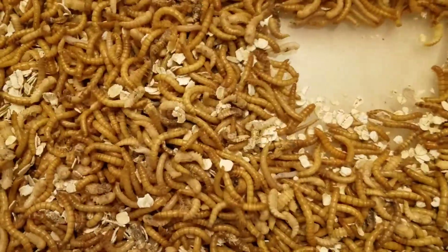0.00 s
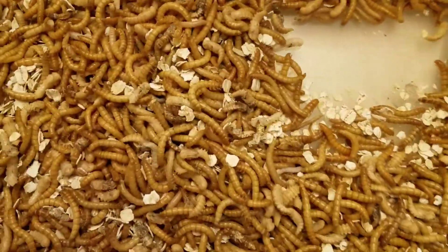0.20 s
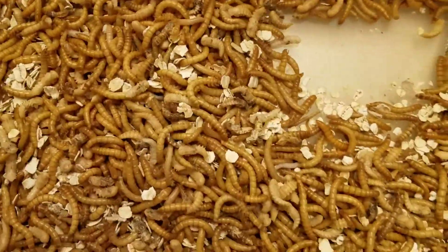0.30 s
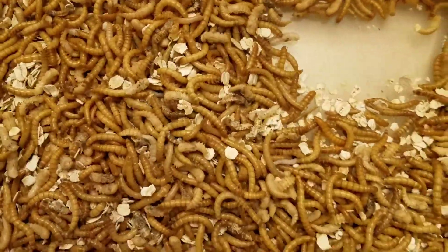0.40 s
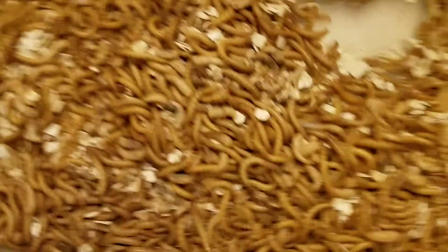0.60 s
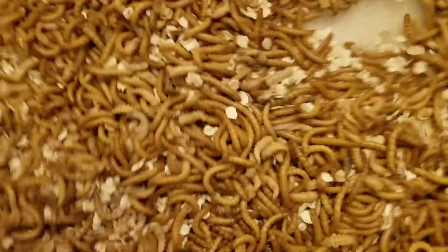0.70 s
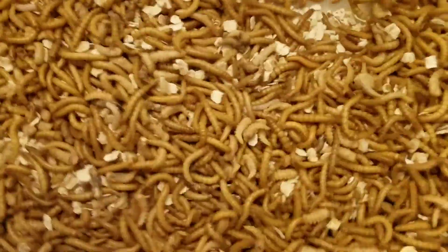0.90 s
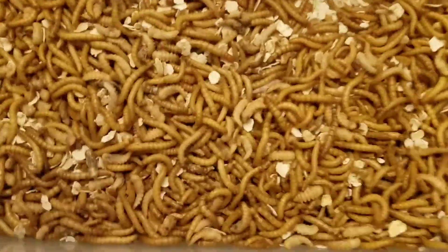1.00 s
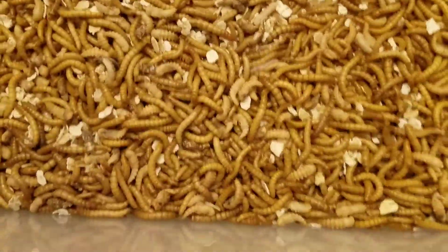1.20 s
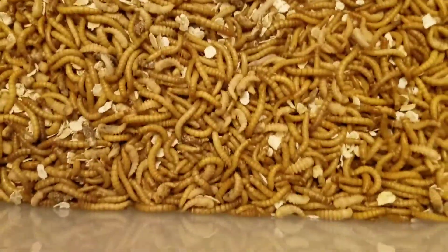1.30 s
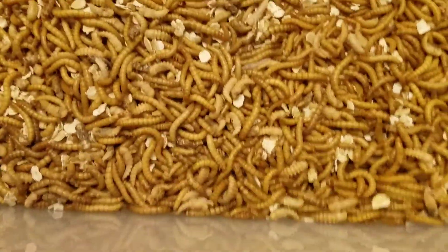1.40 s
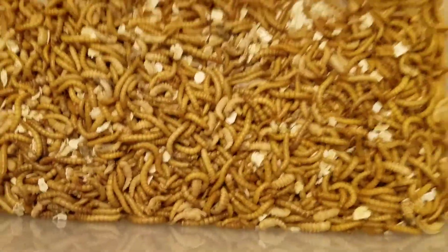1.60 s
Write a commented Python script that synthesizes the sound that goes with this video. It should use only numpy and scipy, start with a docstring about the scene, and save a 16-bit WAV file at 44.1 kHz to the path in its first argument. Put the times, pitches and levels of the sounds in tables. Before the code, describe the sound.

Close to the left microphone, a hand rustles through dry oats and mealworms, catching with snaps and soft bumps between a few dull taps. A steady motor hum and faint crackle of crawling worms fill the room.

```python
"""Dull taps and a few soft bumps sound over a room's motor hum and the faint crackle of mealworms.
A hand is moving over their tub of dry oats, right beside the left microphone. It makes one dry, grainy
brushing stroke, built from thousands of tiny slips. The skin catches with a snap and judders in quick
runs of stick and slip, knocking the hollow casing. A last double tap ends the gesture."""
import sys
import numpy as np
from scipy import signal
from scipy.fft import rfft, irfft
from scipy.io import wavfile

SR = 44100
rng = np.random.default_rng(int(sys.argv[2]) if len(sys.argv) > 2 else 0)


def transcribe(u):
    """Save the signal u as a 16-bit wav file named by the first command-line argument.

    u: samples, shape (n,) or (channels, n), limited to [-1, 1]; the rate is SR.
    q: integer samples, one column per channel.
    """
    v = np.clip(np.atleast_2d(u).T, -1, 1)
    q = np.round(v * 32767).astype(np.int16)
    wavfile.write(sys.argv[1], SR, q)


N = 74970
T = np.arange(N) / SR

# tone of dry friction, for the stroke and the worms: freq_hz, gain_db
FRICTION_EQ = [(150, -20.5), (350, 0.5), (600, -1.5), (790, 2.5), (1000, -12), (1140, 2), (1550, -3.5),
               (1950, 1.5), (2350, -0.5), (2750, 0.5), (3300, -6.5), (4400, -2.5), (6500, -7), (8100, -0.5),
               (9200, -9), (10500, -21), (13000, -26.5), (16000, -32)]
# sharp catches of the skin: start_s, snap_gain_db, knock_gain_db, crumble_s, right_db
CATCHES = [(0.442, -8, -22, 0.0037, -15), (0.4721, -4.5, -31, 0.00047, -2), (0.503, -35, -25, .003, 0),
           (0.6951, 0.5, -17, 0.0042, -28), (0.7, -12.5, -21.5, 0.0018, 5.5),
           (0.7405, -7.5, -20, 0.0013, -0.5), (0.781, -4, -43, 0.00035, -19),
           (0.8132, -1.5, -40, 0.00053, -16), (0.8375, -11, -17.5, 0.0015, -11),
           (0.8753, -2.5, -15.5, 0.0017, -16), (0.9218, -5, -18.5, 0.00028, -3),
           (0.9308, -0.5, -12, 0.0014, -22), (0.991, -21.5, -33, 0.0016, -13),
           (1.2532, -22.5, -39, .002, -1.5)]
# tone of the skin's snaps and grit: freq_hz, gain_db
SNAP_EQ = [(200, 3), (900, -14), (2000, 6), (2700, -3), (3500, -3), (5500, -1), (6800, -6.5), (8000, 5),
           (9500, -13), (11000, -18.5), (16000, -56)]
# resonances of the hollow casing: pitch_hz, gain_db, t60_s
CASING_MODES = [(334, -13.5, 0.058), (477, 0, 0.036), (573, -5, 0.059), (794, 0.5, 0.024), (1127, 0, 0.039),
                (1285, -1, 0.046), (1670, -10.5, 0.09), (2090, -1.5, 0.018), (2880, -7, 0.0077)]
# shading of the far (right) microphone: freq_hz, gain_db
FAR_SIDE_EQ = [(200, -5), (500, -2), (1000, -5.5), (2000, -11.5), (4500, -11), (8000, -10), (13000, 1)]


def from_db(db):
    """Decibels to gain."""
    return 10 ** (np.asarray(db) / 20)


def rms_one(x):
    """Scale to unit rms."""
    return x / np.sqrt(np.mean(x ** 2) + 1e-20)


def fader(points):
    """Gain along a (time_s, gain_db) curve, silent outside it."""
    time_s, gain_db = np.transpose(points)
    return from_db(np.interp(T, time_s, gain_db, left=-120, right=-120))


def colour(x, points):
    """Minimum-phase EQ through (freq_hz, gain_db) points."""
    size = 2 * N
    hz, db = np.transpose(points)
    grid = np.maximum(np.arange(N + 1) * SR / size, 1)
    cepstrum = irfft(np.log(from_db(np.interp(np.log(grid), np.log(hz), db))))
    cepstrum[1:N] *= 2
    cepstrum[N + 1:] = 0
    return irfft(rfft(x, size) * np.exp(rfft(cepstrum)))[..., :N]


def noise(eq, shape=N):
    """Coloured noise at unit rms."""
    return rms_one(colour(rng.standard_normal(shape), eq))


def drift(rate_hz):
    """Smooth random wander at unit rms."""
    pole = np.exp(-2 * np.pi * rate_hz / SR)
    return rms_one(signal.lfilter([1], [1, -2 * pole, pole * pole], rng.standard_normal(2 * N))[N:])


def grains(per_s, spread_db):
    """Random clicks of uneven size, separate for each side."""
    sizes = from_db(spread_db * np.minimum(rng.exponential(1, (2, N)), 5))
    return sizes * rng.choice([-1, 1], (2, N)) * (rng.random((2, N)) < per_s / SR)


def sides(right_db):
    """Gains of left and right."""
    return np.array([[1], [from_db(right_db)]])


def ring(x, modes):
    """Damped resonances of alternating polarity, set ringing by x."""
    out = 0
    for k, (hz, db, t60_s) in enumerate(modes):
        radius, angle = from_db(-60 / (t60_s * SR)), 2 * np.pi * hz / SR
        mode = signal.lfilter([0, np.sin(angle)], [1, -2 * radius * np.cos(angle), radius ** 2], x + 1e-18)
        out = out + (-1) ** k * from_db(db) * mode
    return out


def fall(start_s, decay_s):
    """Sudden start, exponential decay."""
    return (T >= start_s) * np.exp(-np.maximum(T - start_s, 0) / decay_s)


def swell(centre_s, half_s):
    """A bell-shaped rise and fade."""
    return np.exp(-((T - centre_s) / half_s) ** 2)


def click(start_s):
    """A unit click."""
    return 1.0 * (np.arange(N) == int(start_s * SR))


def room_air():
    """Soft room tone, nearly centred in the bass and wide in the treble."""
    # tone of the room: freq_hz, gain_db
    room_eq = [(20, -26), (60, 3.5), (120, 15.5), (200, 10), (290, 4.5), (370, 2), (550, -3.5), (950, -10),
               (1300, -8.5), (2700, -15), (3400, -19.5), (6500, -24), (8200, -15.5), (10500, -27.5),
               (16000, -31.5)]
    width = colour(rng.standard_normal(N), [(250, -15), (1500, 2.5), (5000, 0)])
    air = rng.standard_normal(N) + width * np.array([[1], [-1]])
    return rms_one(colour(air, room_eq)) * from_db(-46.5)


def motor_hum():
    """A motor's low partials, each wavering in level and pitch."""
    # tones of the motor: pitch_hz, level_db
    partials = [(122, -50), (245, -55.5), (290.7, -58.5)]
    waver_db, pitch_wander = 1.5, 0.0398
    out = np.zeros(N)
    for pitch_hz, level_db in partials:
        gain = np.sqrt(2) * from_db(level_db + waver_db * drift(rate_hz=13))
        cycles = pitch_hz * np.cumsum(1 + pitch_wander * drift(rate_hz=8.1)) / SR
        out += gain * np.sin(2 * np.pi * (cycles + rng.random()))
    return out


def worms():
    """Worms crawling in dry oats make a faint crackle of tiny clicks."""
    return rms_one(colour(grains(per_s=690, spread_db=3.5), FRICTION_EQ)) * from_db(-58)


def taps():
    """Dull hollow taps with a short ringing scratch on top, and a few light scuffs of that scratch."""
    # taps around the stroke: start_s, knock_gain_db, pitch_ratio, scratch_gain_db, decay_s, right_db
    hits = [(0.128, -19.5, 0.96, -33.5, 0.011, -8.5), (0.175, -27, 0.99, -27, 0.0044, -8),
            (0.2222, -20.5, 0.68, -23.5, 0.0023, -6.5), (0.268, -31, 0.9, -54, 0.0027, -5),
            (1.129, -37.5, 0.7, -35.5, 0.012, -1), (1.245, -25, 0.91, -20.5, 0.0023, -6),
            (1.254, -18.5, 0.95, -13, 0.0017, -4.5), (1.342, -38, 0.99, -33, 0.0033, -12)]
    # hollow ring of a tap: pitch_hz, gain_db, t60_s
    knock_modes = [(373, -5.5, 0.11), (450, -2, 0.031), (548, 5, 0.038), (796, -8, 0.037),
                   (1175, -12, 0.087), (1323, -15, 0.087), (1680, -19, 0.075)]
    # tone of the scratch: freq_hz, gain_db
    scratch_eq = [(200, -5), (1000, 0), (1900, 1), (2650, 5.5), (3400, -2), (4300, -5.5), (6000, -8),
                  (8200, -5), (10500, -15), (16000, -23)]
    # bright ring of the scratch: pitch_hz, gain_db, t60_s
    scratch_modes = [(2611, 1, 0.044), (4420, 1, 0.012)]
    # light after-touches: centre_s, half_length_s, level_db
    scuffs = [(1.145, .008, -37.5), (1.258, 0.016, -38.5), (1.383, 0.048, -49.5)]
    grit = noise(scratch_eq, (2, N))
    sheen = rms_one(ring(rng.standard_normal(N), scratch_modes))
    scratch = rms_one(grit + from_db(-2.5) * sheen)
    scuffing = sum(from_db(db) * swell(centre_s, half_s) for centre_s, half_s, db in scuffs)
    out = scratch * scuffing * sides(right_db=-10)
    for start_s, knock_db, pitch_ratio, scratch_db, decay_s, right_db in hits:
        tuned = [(hz * pitch_ratio, db, t60_s) for hz, db, t60_s in knock_modes]
        knock = ring(click(start_s), tuned) * from_db(knock_db)
        scrape = scratch * fall(start_s, decay_s) * from_db(scratch_db)
        out += (knock + scrape) / 2 * sides(right_db)
    return out


def bumps():
    """Soft bumps of two or three low swings each, nearly alike on both sides."""
    # bumps of the hand: start_s, pitch_hz, level_db
    hits = [(0.1758, 151, -24), (0.221, 154, -15.5), (0.271, 141, -21), (0.503, 148, -17.5),
            (0.684, 139, -15.5), (0.698, 192, -18), (0.704, 158, -11.5), (0.806, 140, -26),
            (0.93, 186, -20), (1.2564, 182, -22)]
    rise_s, decay_s, low_cut_hz = 0.0015, 0.007, 74
    out = np.zeros(N)
    for start_s, pitch_hz, level_db in hits:
        age = np.maximum(T - start_s, 0)
        envelope = (1 - np.exp(-age / rise_s)) * np.exp(-age / decay_s)
        out -= from_db(level_db) * envelope / envelope.max() * np.sin(2 * np.pi * pitch_hz * age)
    low_cut = signal.butter(2, low_cut_hz, "high", fs=SR, output="sos")
    return signal.sosfilt(low_cut, out * sides(right_db=-2))


def brushing():
    """Thousands of tiny slips, easing before each catch, over the rumble of the hand's weight."""
    # contour of the stroke: time_s, gain_db
    stroke = [(0.33, -69), (0.432, -30.5), (0.444, -26), (0.452, -30), (0.506, -30), (0.538, -22.5),
              (0.574, -29), (0.644, -21), (0.672, -35), (0.686, -28.5), (0.698, -28), (0.71, -24),
              (0.74, -26), (0.75, -30.5), (0.766, -31), (0.78, -21.5), (0.8, -32.5), (0.844, -25),
              (0.854, -34.5), (0.868, -35), (0.872, -33.5), (0.908, -34), (0.934, -39), (0.942, -39),
              (1.12, -56)]
    # narrow resonances that tint the brushing: pitch_hz, gain_db, t60_s
    tint_modes = [(810, 0, 0.025), (1138, -1, 0.17), (1322, -1, 0.043), (1722, -0.5, 0.065),
                  (1950, 0, 0.048), (2120, 0.5, 0.059), (2510, -3, 0.062), (2754, 8, 0.028),
                  (4450, -6.5, 0.066)]
    # weight of the hand, heard as rumble: time_s, level_db
    weight = [(0.33, -78), (0.38, -40.5), (0.44, -37.5), (0.48, -33.5), (0.52, -29.5), (0.62, -34.5),
              (0.67, -32.5), (0.715, -18.5), (0.755, -32), (0.81, -37), (0.84, -29), (0.88, -26),
              (0.93, -36), (0.96, -39), (1.01, -37.5), (1.08, -56), (1.12, -70)]
    # tone of that rumble: freq_hz, gain_db
    rumble_eq = [(20, -23), (45, -18.5), (75, -5), (150, -8), (240, -4.5), (320, -13), (600, -13),
                 (2000, -95.5)]
    stick_s, stick_depth = 0.0062, 0.22
    boost_db, flutter_db = 4, 1.1
    slips = rms_one(colour(grains(per_s=16000, spread_db=2.5), FRICTION_EQ))
    tint = rms_one(ring(rng.standard_normal((2, N)), tint_modes))
    rub = slips + from_db(-5.5) * tint
    stuck = sum(swell(catch_s - stick_s / 2, stick_s / 2) for catch_s, *_ in CATCHES)
    sliding = np.clip(1 - stick_depth * stuck, 0, 1)
    left, right = rub * sliding * fader(stroke) * from_db(boost_db + flutter_db * drift(rate_hz=120))
    rumble = noise(rumble_eq) * fader(weight)
    return np.array([left, colour(right, FAR_SIDE_EQ)]) + rumble * sides(right_db=-3.5)


def catches():
    """Each catch of the skin is a snap that crumbles away in milliseconds, and a knock on the casing."""
    out = np.zeros((2, N))
    crumbs = noise(SNAP_EQ, (2, N))
    for start_s, snap_db, knock_db, crumble_s, right_db in CATCHES:
        snap = crumbs * fall(start_s, crumble_s) * from_db(snap_db)
        knock = ring(click(start_s), CASING_MODES) * from_db(knock_db)
        out += (snap + knock) / 2 * sides(right_db)
    return out


def judders():
    """Uneven runs of stick and slip swell and fade, each slip knocking the casing, over a dull drag."""
    # quick runs of the skin catching and slipping: start_s, length_s, slips_per_s, gain_db
    runs = [(0.693, 0.019, 455, -19.5), (0.718, 0.0244, 485, -15.5), (0.835, 0.015, 380, -15.5),
            (0.856, 0.014, 580, -23.5), (0.875, 0.015, 370, -21.5), (0.921, 0.019, 530, -23)]
    # tone of the drag between slips: freq_hz, gain_db
    drag_eq = [(80, -3), (250, 2), (420, -7.5), (700, 2.5), (900, -0.5), (1400, -6), (2200, -9),
               (4000, -27), (10000, -45)]
    slip_db, grit_db, drag_db = -3, -6, -4
    jitter, far_lag_s = 0.10, 0.0002
    near, pressing = np.zeros(N), np.zeros(N)
    for start_s, length_s, slips_per_s, gain_db in runs:
        gaps = 1 + jitter * rng.standard_normal(40)
        times = start_s + (np.cumsum(gaps) - 1) / slips_per_s
        times = times[times < start_s + length_s]
        slips = np.zeros(N)
        slips[(times * SR).astype(int)] = 0.5 + np.sin(np.pi * (times - start_s) / length_s)
        knocks = rms_one(ring(slips, CASING_MODES))
        grit = from_db(grit_db) * rms_one(colour(slips, SNAP_EQ))
        run_share = length_s * SR / N  # a run's energy grows with its length
        near += from_db(gain_db + slip_db) * (knocks + grit) * np.sqrt(run_share)
        pressing += from_db(gain_db) * swell(start_s + length_s / 2, length_s / 2)
    near += noise(drag_eq) * pressing * from_db(drag_db)
    far = colour(np.interp(T - far_lag_s, T, near), FAR_SIDE_EQ)
    return np.array([near, far])


def scene():
    """The hand in front, the worms and the room behind."""
    # the background dips briefly after the stroke: time_s, gain_db
    background_ride = [(0, 1.5), (0.34, 2.5), (1.0, 0), (1.11, -1.5), (1.21, -1.5), (1.35, 2.5),
                       (1.5, -0.5), (1.71, 0)]
    hand = brushing() + judders() + catches() + taps() + bumps()
    background = room_air() + motor_hum() + worms()
    return hand + background * fader(background_ride)


def record(dry):
    """Peaks are rounded and the top is cut."""
    stop_hz = 16900
    high_cut = signal.cheby2(16, 70, stop_hz, fs=SR, output="sos")
    return signal.sosfilt(high_cut, np.tanh(dry))


dry = scene()
out = record(dry)
transcribe(out)
```